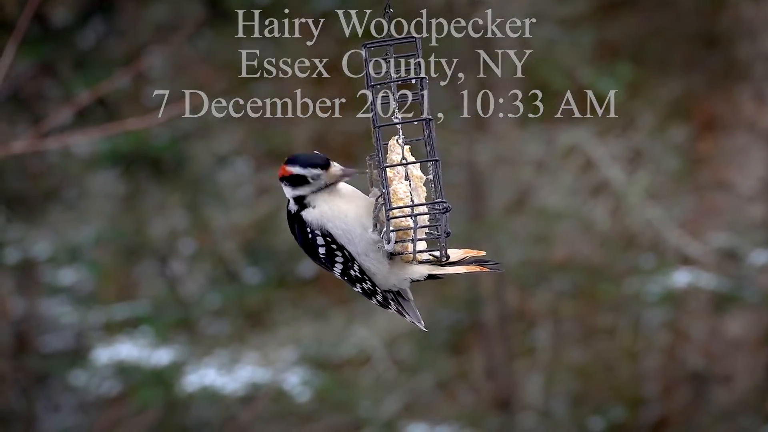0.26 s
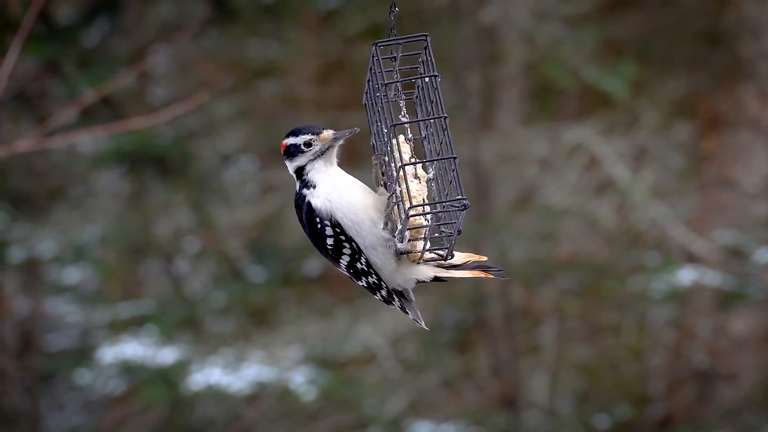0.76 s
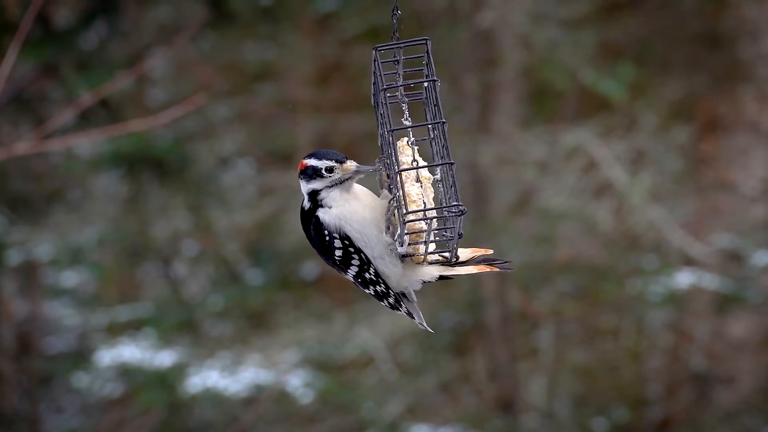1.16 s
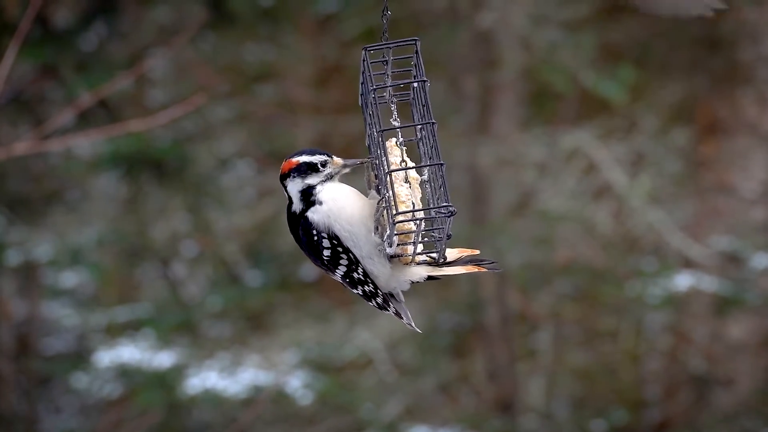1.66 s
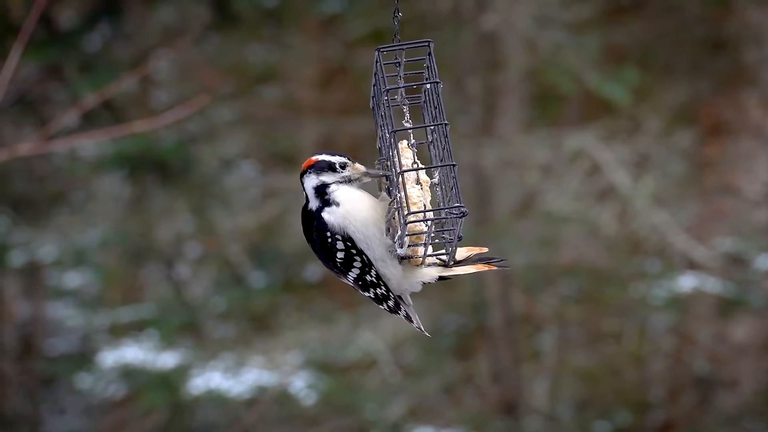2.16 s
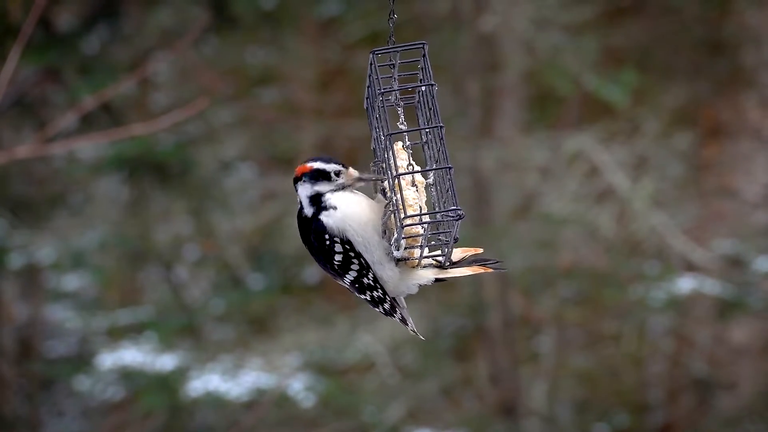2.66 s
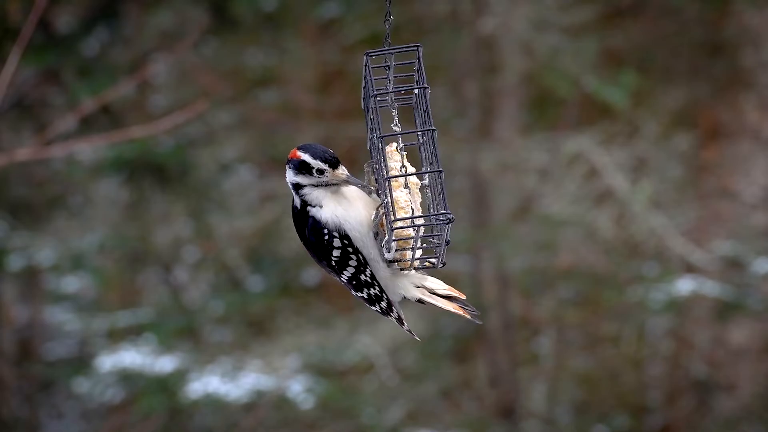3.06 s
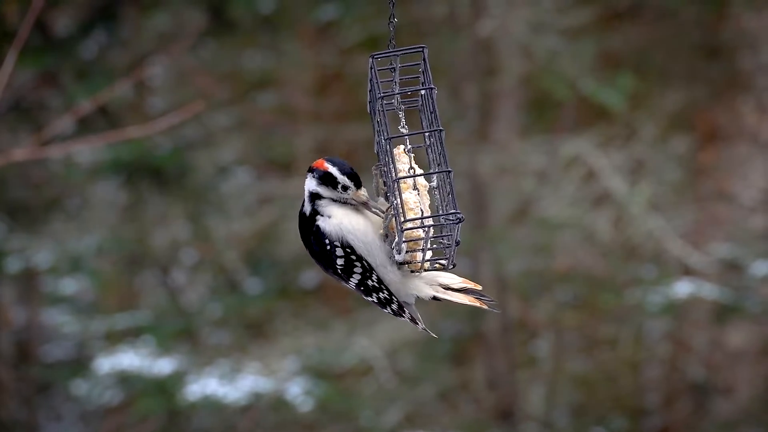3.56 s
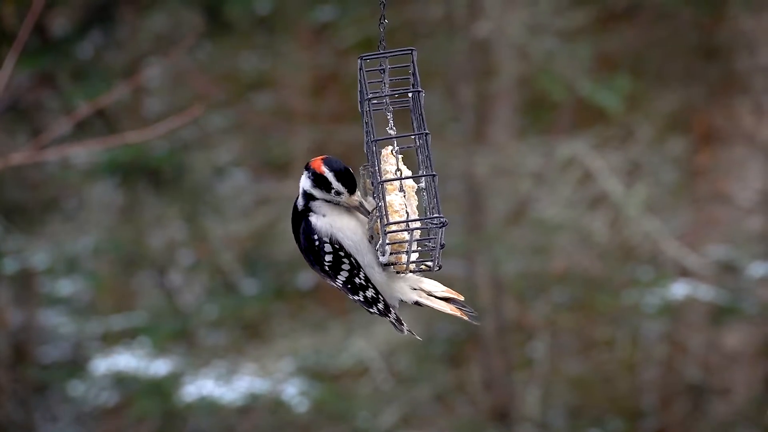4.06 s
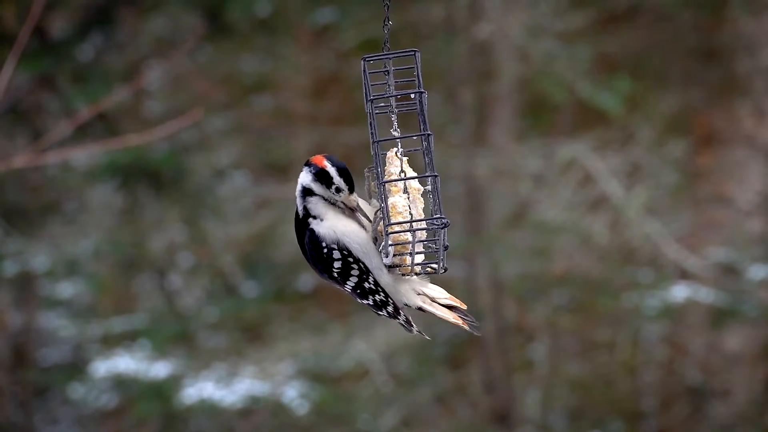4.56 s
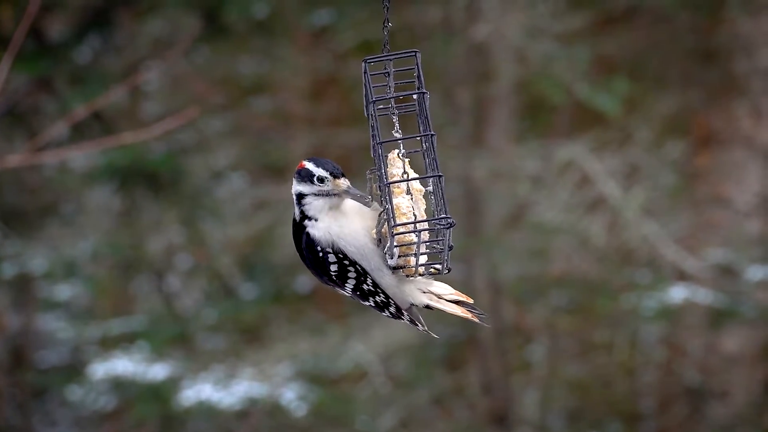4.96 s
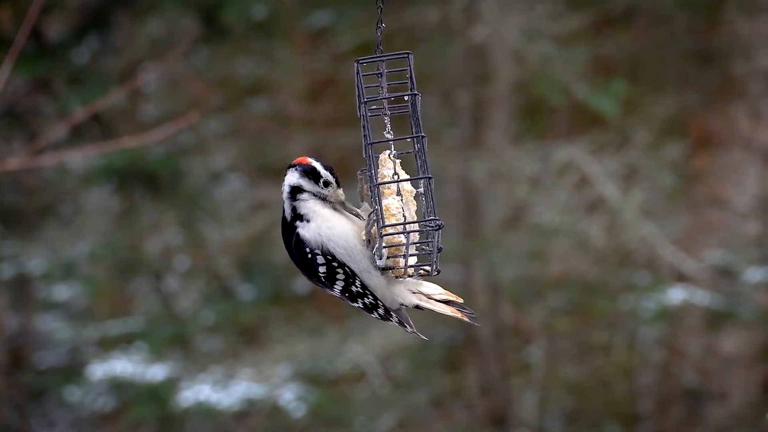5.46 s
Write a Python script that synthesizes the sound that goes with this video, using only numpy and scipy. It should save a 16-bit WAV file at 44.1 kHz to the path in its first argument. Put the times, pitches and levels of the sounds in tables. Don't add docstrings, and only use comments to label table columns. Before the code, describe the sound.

Outdoor winter yard in stereo. Very short, arched metallic squeaks start at once, mixed with gritty scrapes and tiny hanger creaks just right of centre. After a lull they return louder from about 2.8 seconds. A brief small-bird call comes from the left near the end, with a barely audible distant whistle. Steady wash, hiss and far traffic hum underneath, with a short airy tail.

```python
import sys
import numpy as np
from scipy import signal
from scipy.io import wavfile
from scipy.ndimage import uniform_filter1d

SR = 44100
rng = np.random.default_rng(int(sys.argv[2]) if len(sys.argv) > 2 else 0)


def output_pcm(signal):
    pcm = np.clip(np.atleast_2d(signal).T, -1, 1) * 32767
    wavfile.write(sys.argv[1], SR, np.round(pcm).astype(np.int16))


def elevation(decibels):
    levels = np.asarray(decibels, float)
    return 10 ** (levels / 20)


N = 251811
LEAD = 2205

# start_s, rise_s, fall_s, squeal_db, top_hz
SQUEAKS = [(-.04, .017, .028, -29, 5900), (.103, .018, 0.02, -28, 5900), (0.322, 0.014, 0.015, -30.5, 5740),
           (.706, 0.011, .018, -32, 5440), (1.046, 0.012, 0.023, -29.5, 5790),
           (1.316, 0.013, 0.031, -25, 5900), (2.818, .026, 0.02, -20.5, 6175),
           (3.406, 0.021, .027, -19, 6230), (3.648, 0.015, 0.024, -24, 5940),
           (3.797, 0.023, 0.017, -25, 6400), (4.128, 0.017, 0.022, -28.5, 5670),
           (4.393, 0.015, 0.018, -23.5, 5830), (4.583, 0.022, .021, -28, 5620),
           (5.049, 0.018, .022, -24.5, 5820)]
BLUR_DB = [7, 13, 9, -3, 2, -9.5, -5.5, -9, -6.5, 3, 1, -11.5, -5, -8]
SQUEAK_WIRE_DB = [-51, -54, -48, -47, -49, -53, -45.5, -43, -48, -42, -46.5, -49, -57, -41.5]
ARCH = [0.43, 0.53, 0.65, 0.53, 0.35, .5, 1.5, 1.12, 1.39, 1.33, 1.17, 0.86, 0.74, 1.32]
# start_s, length_s, grit_db, wire_db, wire_hz
SCRAPES = [
    (.506, 0.06, -31, -34, 2830),
    (1.473, 0.024, -62, -56, 3070),
    (1.947, 0.032, -55, -52, 3570),
    (2.863, 0.033, -29, -37.5, 3200),
    (3.797, 0.052, -39, -35.5, 3040),
    (4.16, 0.042, -33, -38, 3100),
    (5.087, 0.035, -31.5, -34, 3200),
]
# mode_hz, width_hz, level_db
SQUEAK_MODES = [(3240, 390, -17.5), (4500, 2800, -9.5), (7300, 180, -11), (8400, 1500, -12.5),
                (9550, 1400, -2), (10860, 520, -12), (12400, 470, -21)]
# mode_hz, width_hz, level_db
SCRAPE_MODES = [(4500, 7400, -6.5), (7400, 970, -5.5), (9330, 2900, 5), (10400, 2500, -11),
                (11800, 1500, -10), (14600, 2200, -47)]
# mode_hz, width_hz, level_db
SUET_MODES = [(810, 330, 4.5), (1190, 190, 4.5), (1870, 380, 2)]
# start_s, length_s, start_hz, end_hz, level_db
CREAKS = [
    (0.484, 0.0098, 3320, 3530, -30.5),
    (.705, .014, 3330, 3430, -32),
    (1.823, 0.014, 1056, 875, -44.5),
    (2.811, 0.0085, 3170, 3620, -50),
    (3.636, 0.012, 2180, 2160, -45.5),
]
# start_s, length_s, start_hz, end_hz, level_db
PIPS = [(0.104, .012, 3240, 3680, -34.5), (0.322, 0.015, 3230, 3570, -35), (0.49, 0.0076, 4300, 4500, -37),
        (0.495, 0.0051, 2700, 2780, -42), (0.507, 0.004, 9400, 9450, -29), (1.442, 0.0087, 3630, 3840, -50),
        (1.949, 0.019, 3520, 3570, -37.5), (3.495, 0.023, 2190, 2150, -54.5),
        (3.499, .015, 3240, 3260, -57), (3.642, .008, 2940, 3330, -49), (3.65, 0.0096, 3740, 3780, -36),
        (4.103, .02, 2880, 2880, -54), (4.389, 0.0074, 3700, 3780, -44), (4.593, 0.0058, 3690, 3720, -35),
        (5.053, 0.01, 3760, 3720, -37)]
# time_s, pitch_hz, level_db
NOTE = [
    (4.78, 7030, -49),
    (4.786, 4750, -52),
    (4.792, 6180, -48),
    (4.8, 6480, -43),
    (4.811, 6640, -36),
    (4.818, 6560, -49),
    (4.822, 3770, -42),
]
# start_s, length_s, start_hz, end_hz, level_db
CHIPS = [
    (4.757, .007, 6150, 4200, -61),
    (4.877, 0.036, 3710, 3760, -60),
    (4.906, 0.011, 3770, 3740, -53),
    (4.916, 0.004, 7000, 4000, -55),
    (4.925, 0.0078, 3520, 5600, -57),
    (4.937, 0.0091, 6980, 3670, -57),
]
# time_s, pitch_hz, level_db
FAR_CALL = [
    (5.0, 2230, -74),
    (5.081, 2440, -61),
    (5.12, 2500, -65),
    (5.165, 2490, -59),
]
# start_s, level_db, centre_hz
WING_FLICKS = [
    (1.804, -58, 6500),
    (1.864, -57, 7000),
    (5.232, -59, 7160),
]
# band_hz, t60_s
YARD_DECAY = [(1500, 0.29), (3300, 0.39), (3800, 0.43), (6000, 0.34), (10000, 0.35), (15000, 0.55)]
# band_hz, width_hz, left_minus_right_db, likeness (0-1)
HUM_BANDS = [(72, 23, 6, 0.4), (142.8, 50, 9, 0.53), (202.3, 53, 12.5, 0), (309.4, 105, 6.5, 0)]
HUM_DB = [-82.5, -70.5, -73.5, -63]
# nearest_s, half_length_s, level_db
PASSES = [
    [(1.1, 0.23, -75), (3.0, 0.75, -73), (3.65, 0.35, -69), (4.0, 0.23, -73), (4.93, 0.17, -65.5),
     (5.66, 0.19, -74)],
    [(2.7, 0.45, -68), (3.9, .12, -55.5), (4.3, 0.26, -57), (4.77, 0.11, -63.5), (5.4, 0.34, -65)],
    [(.7, 0.87, -65.5), (2.3, 0.12, -57), (2.83, 0.06, -58.5), (3.25, 0.44, -50.5), (3.7, 0.078, -62),
     (3.98, 0.044, -56.5), (4.4, 0.27, -62.5), (5.6, 0.39, -52.5)],
    [(0.0, 0.13, -60), (2.5, 0.17, -65), (2.95, 0.34, -61.5), (4.2, 0.28, -57), (4.8, 0.19, -54.5),
     (5.2, 0.27, -56.5)],
]
# band_hz, density_db
WASH = [(25, -23), (50, -12), (100, -12), (200, -0.5), (340, -6), (400, -2), (560, 1), (1000, -1),
        (1280, -1.5), (1550, -9), (2400, -12.5), (3200, -18), (6000, -22.5), (16000, -26.5)]
# band_hz, likeness (-1 to 1)
WASH_LIKENESS = [(60, 0.14), (130, 0.19), (290, -0.011), (640, 0.65), (1410, 0.6), (3100, 0.071),
                 (6820, -0.023), (15000, 0.043)]
# band_hz, left_minus_right_db
WASH_LEAN = [(60, 5), (110, -4), (200, 7), (380, 2), (700, 2.5), (1290, 2), (2380, 2), (4400, 1.5),
             (8120, 0.5), (15000, 0.0)]
# time_s, level_db
WASH_SWELL = [(0.0, -54), (0.65, -53), (0.9, -54), (2.16, -52.5), (2.4, -53.5), (2.72, -53.5), (3.78, -53),
              (4.01, -52), (5.07, -52), (5.71, -51)]

BITE_S, TOUCH_DB, BITE_DB, EASE_DB, LIFT_DB = 0.0069, -19, -10, -14.5, -28
TOUCH_PITCH, BITE_PITCH, EASE_PITCH, LIFT_PITCH = 0.86, 0.93, 0.92, 0.91
BITE_FOLLOW = 0.2
EASE_SHARE = 0.55
WIRE_FOLLOW, WIRE_EARLY_DB = 0.47, -2
GRIT_EARLY_DB = 4.5


def feeder():
    mix = np.zeros(N + LEAD)
    hold = 0.0072
    for (start, rise, fall, db, top_hz), blur_db, wire_db, arch in zip(SQUEAKS, BLUR_DB, SQUEAK_WIRE_DB, ARCH):
        grit_db = -37 + 0.52 * (db + 21)
        rows = press(start, rise - hold / 2, hold, fall - hold / 2, arch, db, top_hz, wire_db, 3720, grit_db)
        wire_width = 280 + 250 * elevation(blur_db)
        add(mix, start, stroke(rows, SQUEAK_MODES, 240, blur_db, wire_width, overtone_db=-32))
    for start, length, grit_db, wire_db, wire_hz in SCRAPES:
        rise = max(0.27 * length, BITE_S + 0.001)
        hold = 0.16 * length
        db = min(-31, grit_db + 6.5)
        rows = press(start, rise, hold, length - rise - hold, 1, db, 5900, wire_db, wire_hz, grit_db)
        add(mix, start, stroke(rows, SCRAPE_MODES, 840, blur_db=38, wire_width=720, overtone_db=-40))
        add(mix, start, thud(rows, -42.5 + 0.93 * (wire_db + 32.5)))
    for start, length, start_hz, end_hz, db in CREAKS:
        fall_db = -0.1597 * (start_hz / 1000) ** 3
        add(mix, start, creak(length, start_hz, end_hz, db, fall_db))
    for start, *shape in PIPS:
        add(mix, start, creak(*shape, fall_db=-16))
    return mix


def press(start, rise, hold, fall, arch, squeal_db, squeal_hz, wire_db, wire_hz, grit_db):
    s = start + np.cumsum([0, BITE_S, rise - BITE_S, hold, EASE_SHARE * fall, (1 - EASE_SHARE) * fall])
    bite_db = min(BITE_DB - BITE_FOLLOW * (squeal_db + 23.5), 0)
    push_db = np.array([TOUCH_DB, bite_db, 0, 0, EASE_DB, LIFT_DB])
    early = s < start + rise - 1e-6
    sag = 1 - np.array([TOUCH_PITCH, BITE_PITCH, 1, 1, EASE_PITCH, LIFT_PITCH])
    pitch_hz = squeal_hz * (1 - arch * sag)
    wire = wire_db + WIRE_FOLLOW * push_db + WIRE_EARLY_DB * early
    grit = grit_db + push_db + GRIT_EARLY_DB * early
    return np.transpose([s, squeal_db + push_db, pitch_hz, wire, wire_hz + 0 * s, grit])


def stroke(rows, modes, line_width, blur_db, wire_width, overtone_db):
    squeal_db, squeal_hz, wire_db, wire_hz, grit_db = curves(rows)
    count = len(squeal_db)
    slips = rng.standard_normal((4, count)) * elevation(2.8 * rng.exponential(1, count))

    line = steadied(resonate(slips[0], squeal_hz, line_width))
    halo = steadied(resonate(resonate(slips[3], squeal_hz, 2500), squeal_hz, 3500))
    overtone = evened(line ** 2 - uniform_filter1d(line ** 2, size=15))
    squeal = evened(line + elevation(blur_db) * halo + elevation(overtone_db) * overtone)

    wire = resonate(resonate(slips[1], wire_hz, wire_width), wire_hz, 2 * wire_width)
    wire = steadied(wire, size=1200)

    cage = np.zeros(count)
    for hz, width, db in modes:
        pitch_spot, level_spot = rng.standard_normal(2)
        ring = evened(resonate(slips[2], hz * (1 + 0.029 * pitch_spot), width))
        cage += ring * elevation(db + 3.9 * level_spot)

    body = elevation(squeal_db) * squeal + elevation(wire_db) * wire + elevation(grit_db) * evened(cage)
    return body * signal.windows.tukey(count, 0.15)


def thud(rows, db):
    wire_db = curves(rows)[2]
    push = rng.standard_normal(len(wire_db))
    block = sum(elevation(mode_db) * evened(resonate(push, hz, width)) for hz, width, mode_db in SUET_MODES)
    return elevation(db + wire_db - wire_db.max()) * evened(block)


def creak(length, start_hz, end_hz, db, fall_db):
    hz = np.linspace(start_hz, end_hz, round(length * SR))
    turns = np.cumsum(hz) / SR
    stack = np.zeros(len(hz))
    for k in range(6):
        if (k + 1) * start_hz < 15000:
            stack += elevation(fall_db * k ** 2) * np.sin(2 * np.pi * (k + 1) * turns)
    return elevation(db) * stack * signal.windows.tukey(len(hz), 0.7)


def bird():
    mix = np.zeros(N + LEAD)
    calls = [NOTE, FAR_CALL]
    for start, length, start_hz, end_hz, db in CHIPS:
        middle = (start + length / 2, (start_hz + end_hz) / 2, db)
        calls.append([(start, start_hz, db - 1), middle, (start + length, end_hz, db - 1)])
    for rows in calls:
        hz, db = curves(rows)
        whistle = np.sin(2 * np.pi * np.cumsum(hz) / SR)
        add(mix, rows[0][0], elevation(db) * whistle * signal.windows.tukey(len(hz), 0.1))
    for start, db, hz in WING_FLICKS:
        tick = evened(resonate(rng.standard_normal(200), hz, 5000))
        add(mix, start, elevation(db) * tick * np.hanning(200))
    return mix


def yard(x, left_db, right_db, left_lag, early_db, wet_db, depth):
    size = SR // 2
    taps = np.zeros((2, size))
    at = np.arange(100, size - 20, 20)
    at = at + rng.integers(0, 20, (2, len(at)))
    np.put_along_axis(taps, at, rng.choice([-1., 1.], at.shape), 1)

    hz, t, z = signal.stft(taps, SR, nperseg=256)
    decay = elevation(-60 * t / depth / read(YARD_DECAY, hz)[:, None])
    tail = signal.istft(z * decay, SR, nperseg=256)[1][:, :size]
    early = taps * elevation(-60 * np.arange(size) / SR / 0.027)
    paths = elevation(wet_db) * tail / np.linalg.norm(tail[0])
    paths += elevation(early_db) * early / np.linalg.norm(early[0])

    direct = np.arange(32) - 16
    paths[0, :32] = elevation(left_db) * np.sinc(direct - left_lag) * np.hanning(32)
    paths[1, :32] = elevation(right_db) * np.sinc(direct) * np.hanning(32)
    return signal.fftconvolve(x[None], paths, axes=1)[:, LEAD + 16:LEAD + 16 + N]


def road():
    out, t = np.zeros((2, N)), np.arange(N) / SR
    for rest_db, passes, (hz, width, lean_db, likeness) in zip(HUM_DB, PASSES, HUM_BANDS):
        level = elevation(rest_db) + sum(elevation(db) * np.exp(-((t - s) / half) ** 2) for s, half, db in passes)
        left, other = (steadied(resonate(n, hz, width), size=12000) for n in rng.standard_normal((2, N)))
        likeness = np.clip(likeness, 0, 1)
        right = likeness * left + np.sqrt(1 - likeness ** 2) * other
        out += level * elevation(np.array([[3.5], [3.0 - lean_db]])) * np.array([left, right])
    return out


def wash():
    frames, hz = N // 256 + 5, np.fft.rfftfreq(1024, 1 / SR)
    a, b, c, d, patches = rng.standard_normal((frames, 513, 5)).T
    patches = evened(uniform_filter1d(uniform_filter1d(patches, size=10, axis=0), size=14, axis=1))
    swell_db = np.interp(np.arange(frames) * 256 / SR, *np.transpose(WASH_SWELL)) + 53
    far = 1 / (1 + (hz[:, None] / 3200) ** 4)

    likeness = np.clip(read(WASH_LIKENESS, hz), -1, 1)[:, None]
    left = a + 1j * b
    right = likeness * left + np.sqrt(1 - likeness ** 2) * (c + 1j * d)
    lean_db = read(WASH_LEAN, hz)[:, None] / 2
    level_db = read(WASH, hz)[:, None] + far * (0.47 * patches + swell_db)
    z = np.array([left, right]) * elevation(level_db + np.array([lean_db, -lean_db]))
    return elevation(-49) * evened(signal.istft(z, nperseg=1024, noverlap=768)[1][:, :N])


def resonate(x, hz, width):
    turn = np.exp(2j * np.pi * np.cumsum(hz * np.ones(len(x))) / SR)
    r = np.exp(-np.pi * width / SR)
    return (turn * signal.lfilter([1], np.poly([r, r]), x / turn)).real


def steadied(x, size=300):
    return x / np.sqrt(abs(uniform_filter1d(x ** 2, size)) + 1e-20)


def evened(x):
    return x / np.sqrt(np.mean(x ** 2) + 1e-20)


def curves(rows):
    s, *columns = np.transpose(rows)
    t = np.arange(s[0], s[-1], 1 / SR)
    return [np.interp(t, s, column) for column in columns]


def read(points, hz):
    f, value = np.transpose(points)
    return np.interp(np.log(hz + 1), np.log(f + 1), value)


def add(mix, start, sound):
    part = mix[round(start * SR) + LEAD:][:len(sound)]
    part += sound[:len(part)]


def scene():
    near = yard(feeder(), left_db=-8, right_db=-1.5, left_lag=3.3, early_db=-11, wet_db=-17, depth=0.95)
    far = yard(bird(), left_db=8, right_db=0.0, left_lag=-1.5, early_db=-3, wet_db=0.5, depth=1.13)
    return near + far + wash() + road()


def roll_off(x):
    return signal.sosfilt(signal.butter(12, 16280, fs=SR, output="sos"), x)


def record(dry):
    limit = signal.firwin(511, 15790, window=("kaiser", 9), fs=SR)
    mix = signal.oaconvolve(dry, limit[None], "same")
    return roll_off(mix)


dry = scene()
out = record(dry)
output_pcm(out)
```